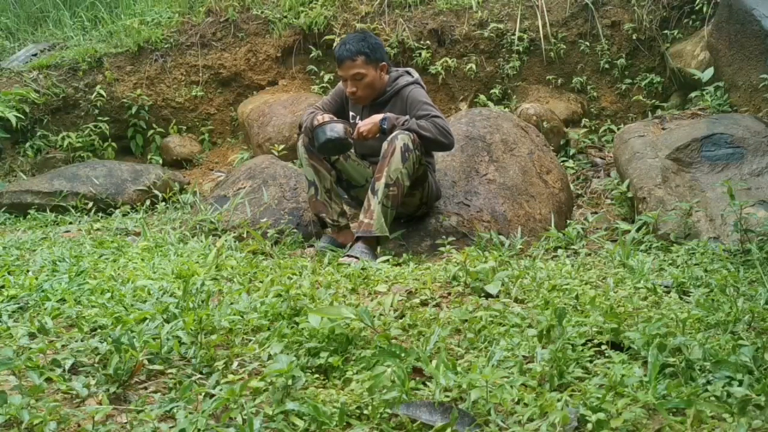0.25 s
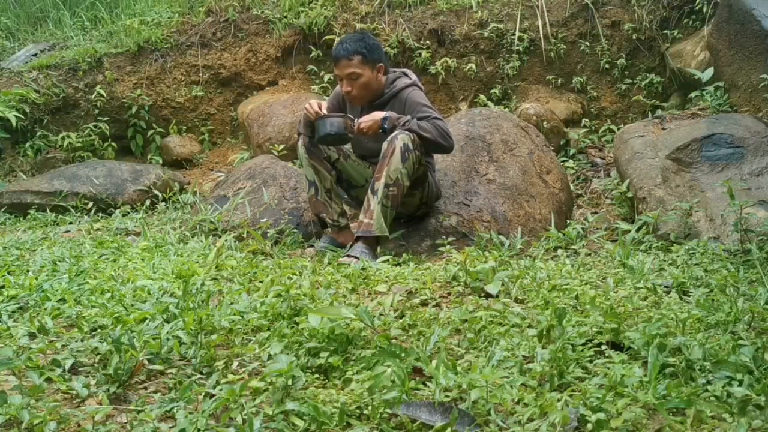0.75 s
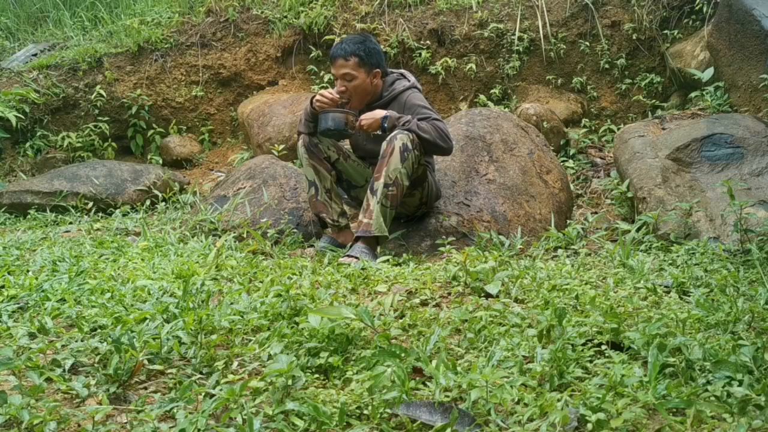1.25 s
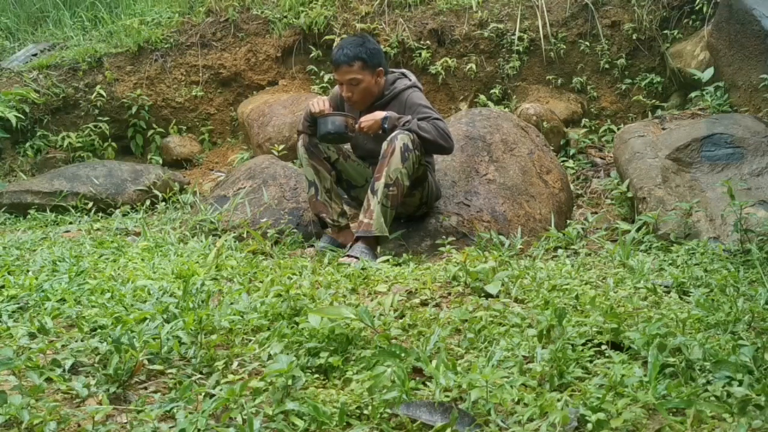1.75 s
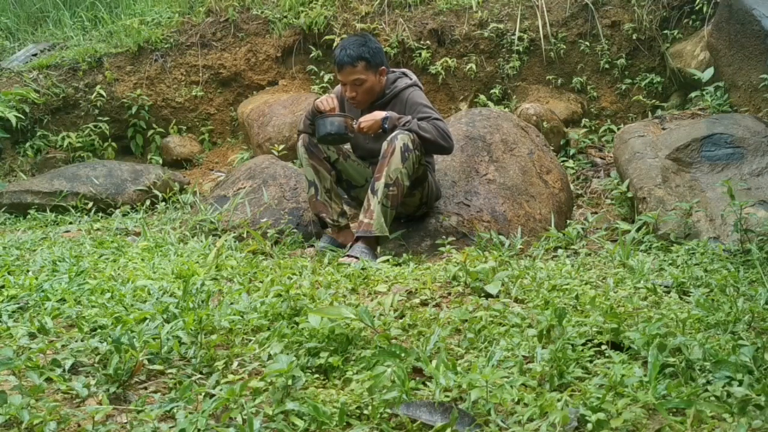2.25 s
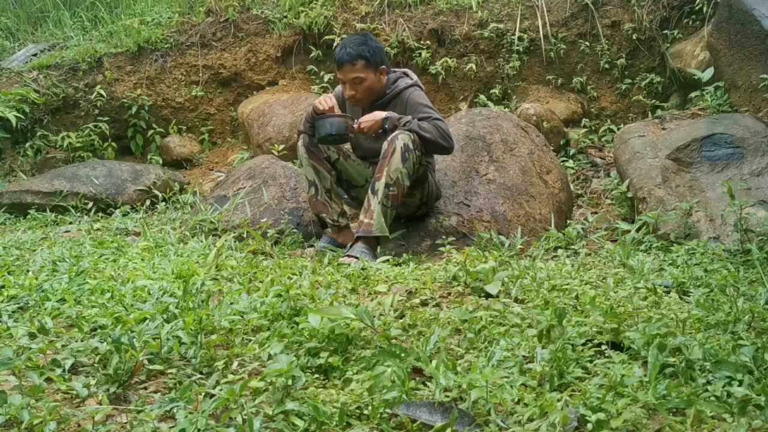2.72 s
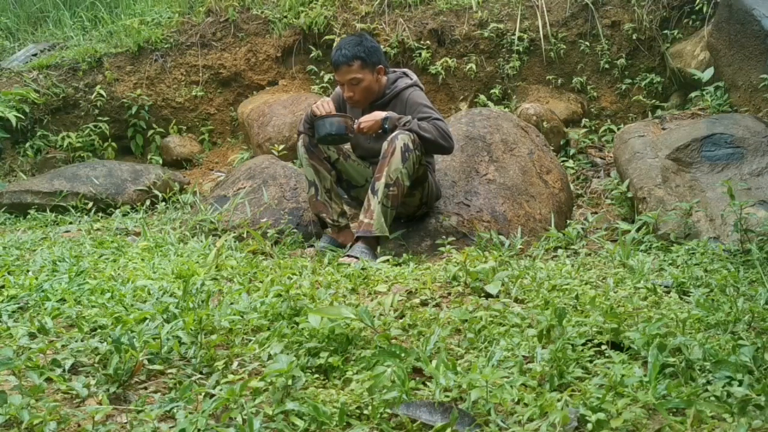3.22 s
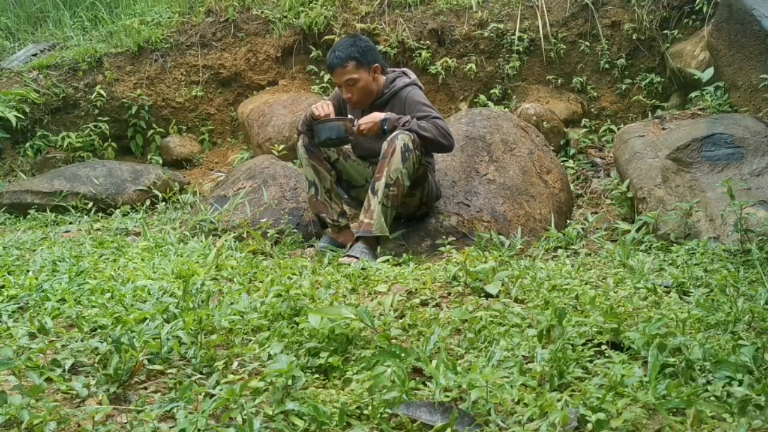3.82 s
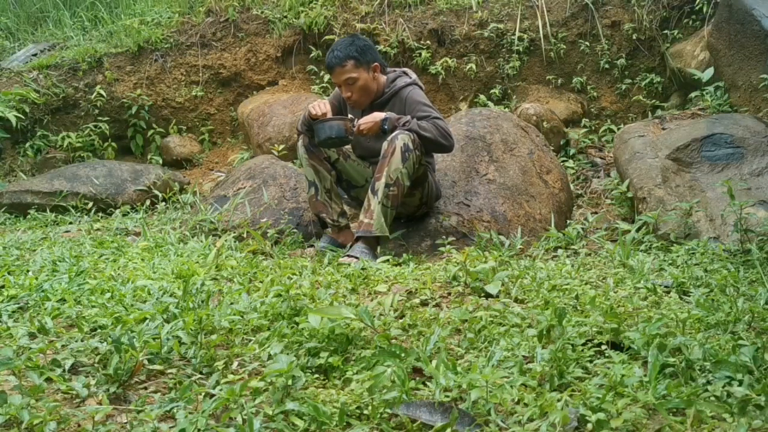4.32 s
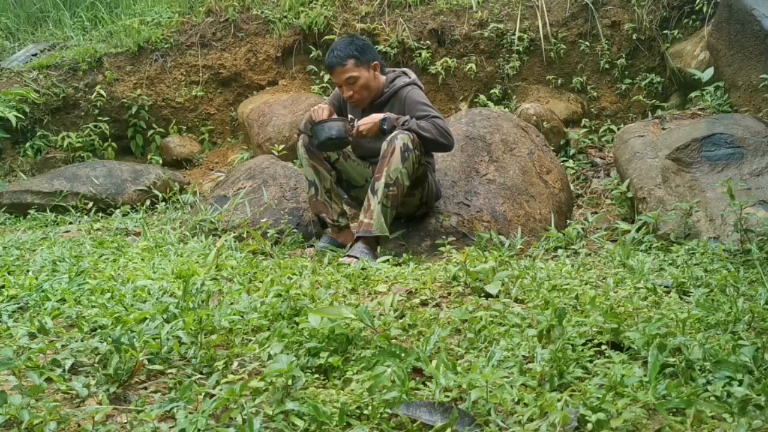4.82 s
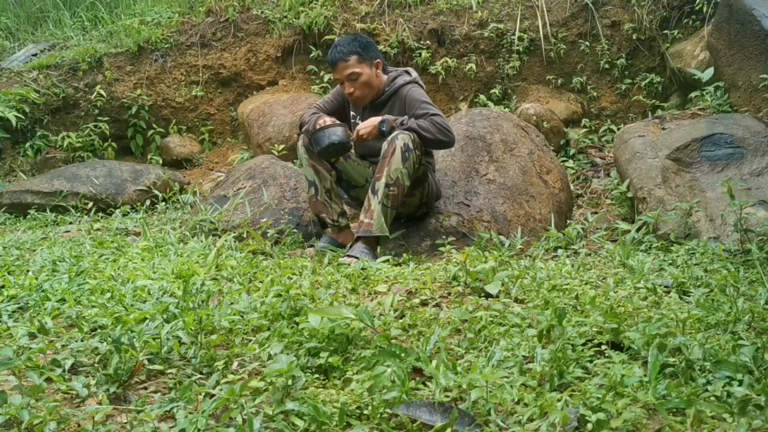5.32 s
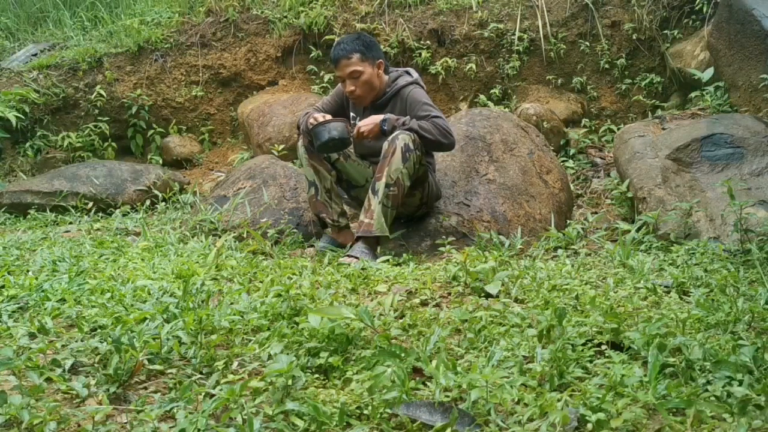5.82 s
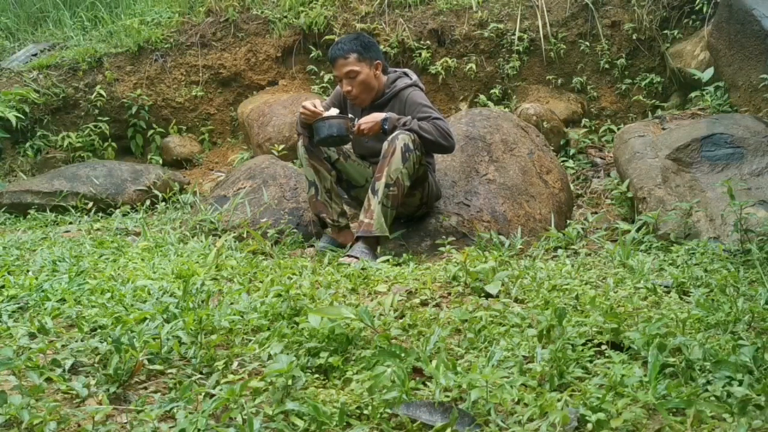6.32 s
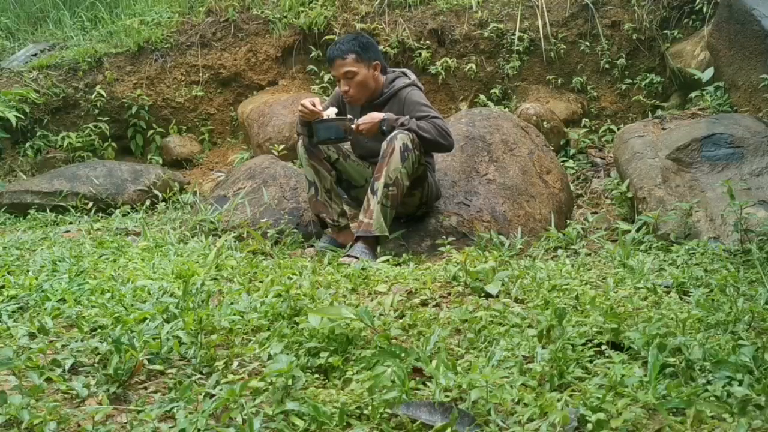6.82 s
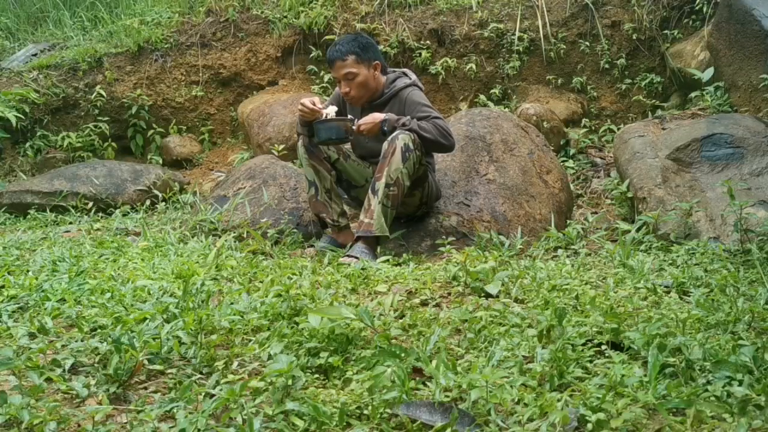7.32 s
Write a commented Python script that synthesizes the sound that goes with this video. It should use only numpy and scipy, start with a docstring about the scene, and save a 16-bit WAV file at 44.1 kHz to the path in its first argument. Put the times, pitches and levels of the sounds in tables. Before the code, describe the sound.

Piercing, gliding insect whine in a tropical clearing, pausing once, with throbbing katydid rasps, distant low engine hum and faint scrapes of a pot.

```python
"""Insects in a forest clearing

A near cicada sings a gliding whine of four tymbal partials, breaks into a buzz of noise bands, rests and starts again;
its partials fade separately at each ear as echoes off the trees interfere. Farther cicadas are thin fading lines,
a katydid throbs in bursts of banded noise, a cricket gives two short sine peeps and a chorus hisses as shaped noise.
A distant engine hums on the left in roughened low orders, and a pot is tapped and scraped in faint puffs of noise."""
import sys
import numpy as np
from scipy import signal
from scipy.fft import rfft, irfft, next_fast_len
from scipy.io import wavfile
from scipy.ndimage import uniform_filter1d, map_coordinates

SR = 44100
rng = np.random.default_rng(int(sys.argv[2]) if len(sys.argv) > 2 else 0)


def boost(x):
    """Linear amplitude factor 10**(x/20) for a level x in decibels (scalar or array-like)."""
    u = np.asarray(x, float) / 20
    return 10 ** u


def wav_record(signal):
    """Record a signal, one row per channel, as 16-bit PCM in the file named by sys.argv[1]."""
    frames = np.transpose(np.atleast_2d(signal))
    bounded = np.clip(frames, -1, 1)
    # unit amplitude maps onto the largest positive 16-bit level
    quanta = np.round(bounded * 32767).astype(np.int16)
    wavfile.write(sys.argv[1], SR, quanta)


N = 332999
TIME = np.arange(N) / SR
HALVES = np.array([[.5], [-.5]])  # shares a left-over-right difference between the two ears

# Clean song of the near cicada. Each row: start in seconds, start of the release in seconds, gain in dB,
# gain of the second partial over the rest in dB.
PHRASES = [(0.05, 3.28, -1, 0.5), (4.54, 7.7, -0.5, -2.5)]


def unit(x):
    """Scaled to rms 1."""
    return x / np.sqrt(np.mean(np.abs(x) ** 2) + 1e-20)


def along(points, hz):
    """Reads (Hz, value) points on a log frequency axis."""
    f, v = np.transpose(points)
    return np.interp(np.log(hz + 1), np.log(f + 1), v)


def curves(rows):
    """One value per sample for each column after the time."""
    s, *cols = np.transpose(rows)
    return np.array([np.interp(TIME, s, c) for c in cols])


def wobble(rate):
    """A smooth random curve for each ear, rate knots a second."""
    knots = rng.standard_normal((2, 4000))
    coarse = TIME[::16]
    return np.array([np.interp(TIME, coarse, map_coordinates(k, [coarse * rate])) for k in knots])


def fading(rate):
    """Complex gain of many interfering paths, rms 1, different at each ear."""
    return unit(wobble(rate) + 1j * wobble(rate))


def turns(hz):
    """Running phase of a pitch curve, in radians."""
    return 2 * np.pi * np.cumsum(hz) / SR


def swells(rest_db, rows):
    """A resting gain with bell-shaped (centre s, half length s, dB) swells added to it."""
    return boost(rest_db) + sum(boost(db) * np.exp(-((TIME - s) / half) ** 2) for s, half, db in rows)


def filtered(x, response):
    """Applies a response of frequency to x."""
    m = next_fast_len(N + 8192)
    return irfft(rfft(x, m) * response(np.fft.rfftfreq(m, 1 / SR)), m)[..., :N]


def bands(table):
    """Noise of rms 1 in bell-shaped (Hz, width Hz, relative dB) bands, unrelated at the two ears."""
    def shape(hz):
        power = sum(boost(2 * db) / w * np.exp(-4 * ((hz - c) / w) ** 2) for c, w, db in table)
        return np.sqrt(power)
    return unit(filtered(rng.standard_normal((2, N)), shape))


def partial(phase, ears_db, alike, flutter, smear_db, smear_rate):
    """A sine at each ear that flutters and shifts apart as likeness falls, in an even smear scattered by the leaves."""
    apart = HALVES * np.arccos(np.clip(alike, -1, 1))
    direct = boost(ears_db) * np.exp(1j * apart) * (1 + flutter * fading(30))
    smear = uniform_filter1d(boost(ears_db + smear_db), size=SR) * fading(smear_rate)
    return np.sqrt(2) * ((direct + smear) * np.exp(1j * phase)).real


def stroke_line(phase, multiple, db, rate):
    """One line of the comb that repeated muscle strokes make, fading at random."""
    ribs = 9  # tymbal cycles for each muscle stroke
    return np.sqrt(2) * boost(db) * (fading(rate) * np.exp(1j * phase * multiple / ribs)).real


def heard(hz):
    """Level at each ear and likeness of a partial: echoes off the trees add up or cancel by pitch."""
    # The pitches in Hz at which the clearing is known, rising.
    clearing_hz = [3050, 3062, 3074, 3089, 3092, 3098, 3101, 3122, 3128, 3131, 3149, 3155, 3170, 3176, 3185,
                   3197, 3203, 3207, 6100, 6220, 6238, 6274, 6286, 6322, 6358, 6364, 6388, 6415, 9150, 9204,
                   9231, 9258, 9330, 9622, 12200, 12216, 12232, 12240, 12256, 12264, 12280, 12296, 12304,
                   12312, 12320, 12328, 12344, 12360, 12368, 12392, 12400, 12432, 12440, 12456, 12472,
                   12488, 12504, 12520, 12560, 12576, 12592, 12600, 12608, 12624, 12632, 12648, 12672,
                   12704, 12720, 12728, 12776, 12784, 12800, 12816, 12824, 12830]
    # What reaches the microphones at each of them. Each row: left in dB, right in dB, before the song's own gains,
    # left-right likeness (held within -1 to 1 in use).
    clearing = [(-70, -58.5, 1.0), (-69, -63.5, -0.59), (-65, -65, -0.87), (-72, -67.5, 0.29),
                (-85, -63, -0.88), (-60, -60.5, -0.49), (-80, -64.5, -0.32), (-52, -65, -0.79),
                (-53, -78, 0.48), (-58, -64.5, 0.68), (-63, -59, -0.28), (-64, -64, -0.42),
                (-63, -55.5, 0.49), (-64, -55.5, -0.83), (-63, -71, -0.27), (-67, -73, -0.6),
                (-60, -60, -0.4), (-68, -65, -0.93), (-79, -67, -0.44), (-60.5, -84, 0.99),
                (-63.5, -66, -0.42), (-62.5, -69, 1.0), (-69, -65, 0.93), (-65.5, -70, 0.29),
                (-63, -72, -1.3), (-63, -65, 0.9), (-67, -74, -0.3), (-63.5, -59, 1.0), (-70, -72, 0.5),
                (-73, -75, -0.32), (-76, -70, 0.5), (-69.5, -85, -0.49), (-87, -80, -0.0), (-90, -84, -1.1),
                (-49, -48, -0.007), (-52, -44, 0.36), (-45, -51, -0.093), (-53, -59, -0.5), (-58, -51, 0.7),
                (-47, -47.5, 0.99), (-50, -52, 0.4), (-44.5, -45, 0.4), (-43, -54, -0.41), (-66, -54, -1.3),
                (-46, -53, -0.53), (-56, -47, -0.84), (-49, -50, 0.84), (-58, -58, -1.2), (-61, -51, 0.6),
                (-59, -46.5, -1.1), (-63, -47.5, 0.16), (-46.5, -43, -0.76), (-63, -45, -1.8),
                (-50, -52, -0.37), (-56, -51.5, 0.47), (-47, -50, -1.8), (-58, -46, 1.0), (-52, -65, -0.95),
                (-59, -47, -0.41), (-54, -68, -0.96), (-52, -40.5, 0.99), (-51, -41.5, -0.0),
                (-42.5, -43.5, -0.58), (-48, -44, 1), (-79, -47, -0.52), (-58, -45, -2), (-53, -57.5, 0.52),
                (-42, -47.5, 0.9), (-50.5, -46, 0.2), (-53, -53.5, -0.58), (-60, -49.5, 0.5),
                (-47, -42.5, 0.56), (-59, -43.5, 0.25), (-61, -36, -0.41), (-56, -52, -1.0),
                (-60, -48.5, 0.42)]
    left, right, alike = (np.interp(hz, clearing_hz, c) for c in np.transpose(clearing))
    return np.array([left, right]), alike


def phrases(attack_s, lead_s=0, second=0):
    """Gain of the clean song: attack, hold and release of each phrase, as squared ramps."""
    release_s = .09
    gain = np.zeros(N)
    for start, end, db, second_db in PHRASES:
        rise = (TIME + lead_s - start) / attack_s
        fall = 1 + (end - TIME) / release_s
        gain += boost(db + second * second_db) * np.clip(np.minimum(rise, fall), 0, 1) ** 2
    return gain


def cicada():
    """Four partials of the tymbal, the stroke lines beside them, and the buzz where strokes turn irregular."""
    # Glide of the near cicada. Each row: time in seconds, tymbal pitch in Hz.
    glide = [(0.1, 3209.9), (1.1, 3178.6), (2.3, 3145.6), (2.9, 3119.1), (3.1, 3108.5), (3.3, 3103.8),
             (4.58, 3048.7), (4.78, 3054.6), (5.18, 3072.2), (5.98, 3098.7), (6.38, 3115.4), (6.78, 3133.5),
             (7.18, 3157.6), (7.38, 3180.2), (7.55, 3195.2)]
    # The echo pattern slides a little as the air moves. Each row: time in seconds, slide in Hz at the first partial.
    slip = [(4, 0), (4.5, -1), (7.1, -1), (7.3, 2.5)]
    # Weak lines a stroke rate apart. Each row: multiple of the stroke rate, left in dB, right in dB,
    # both before the common lift and the phrase gain.
    lines = [(10, -85, -88), (26, -83, -85), (28, -87, -84), (34, -93, -90), (35, -82, -78), (37, -70, -67),
             (38, -86, -84)]
    # Rough start and end of a phrase, a list for each. Each row: time in seconds, level in dB before
    # smoothing and roughening.
    rough_parts = [
        [(0, -62), (.09, -58.5), (.15, -63), (.25, -87)],
        [(3.15, -82.5), (3.28, -57), (3.45, -54.5), (3.6, -58.5), (3.75, -60), (3.9, -69), (4.05, -73)],
    ]
    # Colour of the buzz. Each row: centre in Hz, width in Hz, relative level in dB.
    buzz_bands = [(3110, 360, -6), (6240, 440, 0), (8940, 420, -13), (12340, 600, 2.5)]
    attack_s, stroke_attack_s = 0.11, 0.25  # the stroke lines speak late
    lead_s = .13  # the second partial speaks early
    flare_db, flare_s = 18, 0.088  # the third partial flares around each phrase start

    pitch = curves(glide)[0]
    phase = turns(pitch)
    slid = pitch + curves(slip)[0]
    flare = 1 + sum(boost(flare_db) * np.exp(-np.abs(TIME - s) / flare_s) for s, *_ in PHRASES)

    song = partial(phase, *heard(slid), flutter=0.18, smear_db=-14.0, smear_rate=90)
    second = partial(2 * phase, *heard(2 * slid), flutter=0.28, smear_db=-8.5, smear_rate=13)
    song += partial(3 * phase, *heard(3 * slid), flutter=0.38, smear_db=-6.5, smear_rate=15) * flare
    song += partial(4 * phase, *heard(4 * slid), flutter=.5, smear_db=-21, smear_rate=500)
    second *= phrases(attack_s, lead_s, second=1)

    strokes = sum(stroke_line(phase, k, np.array([[left], [right]]), rate=11) for k, left, right in lines)
    strokes *= boost(4.5)

    buzz_gain = sum(boost(curves(rows)[0]) * (TIME > rows[0][0]) * (TIME < rows[-1][0]) for rows in rough_parts)
    buzz = uniform_filter1d(buzz_gain, size=2000) * boost(1.5 * wobble(60)) * bands(buzz_bands)
    return song * phrases(attack_s) + second + strokes * phrases(stroke_attack_s) + buzz


def rush(spectrum, patchy_db):
    """Stereo noise of rms 1 with patches of random gain over time and pitch."""
    # How alike the two microphones hear it. Each row: frequency in Hz, left-right likeness from -1 to 1.
    likeness = [(60, 0.29), (130, 1), (280, 0.72), (610, 0.28), (1330, -0.29), (2880, 0.1), (6240, -0.1),
                (13500, 0.18)]
    # Which side it leans to. Each row: frequency in Hz, left over right in dB.
    side_lean = [(60, -0.5), (110, 11.5), (200, 5.5), (370, 2), (670, 0.5), (1220, 3), (2220, -0.5),
                 (4060, 4.5), (7420, 2), (13500, -3.5)]

    def mid_side(hz):
        turn = np.arccos(np.clip(along(likeness, hz), -1, 1)) / 2
        return boost(along(spectrum, hz)) * [np.cos(turn), np.sin(turn)]

    z = signal.stft(rng.standard_normal((2, N)), nperseg=512)[2]
    field = uniform_filter1d(rng.standard_normal(z.shape[1:]), size=6, axis=0)
    field = uniform_filter1d(field, size=14, axis=1)
    pair = signal.istft(z * boost(patchy_db * unit(field)), nperseg=512)[1][:, :N]
    mid, side = filtered(pair, mid_side)
    ears = np.array([mid + side, mid - side])
    return unit(filtered(ears, lambda hz: boost(HALVES * along(side_lean, hz))))


def chorus():
    """Countless far insects merge into bands of hiss over the breath of the forest."""
    # Colour of the insect hiss. Each row: frequency in Hz, relative level in dB per Hz.
    insect_hiss = [(2900, -21.5), (3300, -15.5), (3900, -13), (4100, -3), (4600, -0.5), (5250, -6.5),
                   (5500, -10.5), (5800, -7.5), (6050, -4), (6500, 1), (7350, -1), (7650, -13.5),
                   (8300, -13), (8800, -13), (11200, -16.5), (12000, -10), (12800, -1), (13050, -17),
                   (13700, -24)]
    # Colour of the forest's breath. Each row: frequency in Hz, relative level in dB per Hz.
    breath = [(12, -16), (20, -4.5), (38, -4.5), (114, -2), (150, -6), (197, -3.5), (242, -9.5),
              (299, -7.5), (445, -13.5), (1170, -19), (2190, -17), (2650, -19), (3000, -15), (3900, -26.5),
              (6600, -120)]
    return boost(-57.5) * rush(insect_hiss, patchy_db=0.46) + boost(-60.0) * rush(breath, patchy_db=1.55)


def engine():
    """Unsteady low orders of a far engine, rougher as they rise, among other fuzzy hums from the same side."""
    # Pace of the engine. Each row: time in seconds, firing rate in Hz before a slight random wobble.
    firing = [(0, 98), (0.9, 99.5), (1.4, 101), (1.9, 102.8), (2.35, 103), (2.8, 104.8), (5.3, 104.8),
              (6.3, 102.5), (7.55, 100.6)]
    # Its hum, before the dips and the mix to two ears. Each row: time in seconds, first order in dB,
    # second over first order in dB.
    order_levels = [(0, -62, 7.5), (0.4, -59, -10.5), (1.02, -56, -14), (1.2, -54, -1), (1.68, -50.5, -3.5),
                    (2, -59, 3.5), (2.2, -59.5, 9.5), (2.85, -61, 10.5), (3.3, -62, 16), (3.6, -56.5, 7),
                    (4.05, -55.5, 1), (4.5, -62, 6.5), (5.25, -68.5, 9), (5.45, -75, 3), (5.95, -62.5, 1),
                    (6.1, -72, 3.5), (6.65, -72, -0.5), (6.8, -62.5, -13), (7.55, -69, -18)]
    # Gain of the left over the right in dB, for orders 1 to 4.
    order_lean = [8.5, 3.8, 4.1, 2.1]
    # Share of random fading in orders 1 to 4, from 0 to 1.
    order_rough = [.2, .28, .5, .6]
    # The hum dips briefly. Each row: centre in seconds, half length in seconds, full depth in dB.
    dips = [(2.015, 0.052, 3.5), (2.545, 0.045, 8), (3.068, 0.12, 16), (3.48, 0.052, 5), (3.77, 0.082, 8.5),
            (4.1, .05, 6), (4.713, 0.041, 10)]
    # Share of the full depth taken by orders 1 and 2.
    dip_share = [0.14, 1]
    # The third and fourth orders swell. Each row: centre in seconds, half length in seconds,
    # third-order swell in dB before the mix to two ears.
    rasp_swells = [(0.696, 0.18, -66), (2.67, 0.042, -71.5), (3.45, 0.4, -61), (4.006, 0.16, -67),
                   (4.313, 0.14, -62), (4.676, 0.052, -67), (5.925, .1, -64.5)]
    # Fuzzy low tones. Each row: centre in Hz, width in Hz, resting level in dB, and swells as centre in seconds,
    # half length in seconds, level in dB; all levels before the mix to two ears.
    fuzzy_tones = [(55.3, 9.1, -66, [(5.9, .3, -68)]), (140.4, 18, -85, [(.6, 0.47, -62.5),
                   (2.95, 0.45, -63.5), (5.4, 0.97, -63.5)]), (276, 26, -74.5, [(4.6, 0.67, -68),
                   (5.9, .2, -65.5), (7.3, 0.62, -67.5)]), (341, 26, -86, [(3.4, 0.33, -63),
                   (4.7, 0.47, -66)])]

    hz = curves(firing)[0]
    first_db, second_db = curves(order_levels)
    phase = turns(hz * (1 + 0.0039 * wobble(5)[0]))
    dip_db = sum(depth_db * np.exp(-((TIME - s) / half) ** 2) for s, half, depth_db in dips)
    first = boost(first_db - dip_share[0] * dip_db)
    second = boost(first_db + second_db - dip_share[1] * dip_db)
    third = swells(-73, rasp_swells)
    fourth = boost(-11.0) * third

    out = np.zeros((2, N))
    orders = zip([first, second, third, fourth], order_lean, order_rough)
    for k, (gain, lean_db, rough) in enumerate(orders, 1):
        line = unit(((1 - rough + rough * fading(22)) * np.exp(1j * k * phase)).real)
        # mostly one signal at both ears, with a little of each ear's own
        out += gain * boost(HALVES * lean_db) * (0.65 * line[0] + 0.086 * line)
    for hum_hz, width, rest_db, rows in fuzzy_tones:
        hum = bands([(hum_hz, width, 0)])
        out += swells(rest_db, rows) * boost(HALVES * 4.4) * (0.5 * hum[0] + 0.11 * hum)
    return out


def far_cicadas():
    """The same kind of song from farther trees: only thin fading lines reach the microphone."""
    # A list for each phrase. Each row: time in seconds, tymbal pitch in Hz, level in dB before the line's own.
    far_songs = [
        [(.1, 3070, -85), (.2, 3080, -72), (.45, 3112, -70), (.9, 3090, -76), (1, 3085, -90)],
        [(1.1, 3070, -90), (1.4, 3080, -72), (2.5, 3110, -71), (3.3, 3140, -74), (4.3, 3175, -78),
         (4.5, 3180, -90)],
        [(.9, 3230, -90), (1.2, 3225, -76), (2.1, 3196, -74), (3.1, 3150, -75), (3.3, 3145, -90)],
        [(3.5, 3120, -90), (3.7, 3115, -74), (4.4, 3100, -71), (5, 3088, -75), (5.3, 3080, -90)],
        [(4.45, 3188, -90), (4.65, 3182, -70), (5.1, 3163, -72), (5.3, 3155, -90)],
    ]
    # Lines that carry. Each row: multiple of the stroke rate, relative level in dB.
    far_lines = [(9, -8), (18, -8), (27, -14), (36, 0), (37, -6)]
    out = np.zeros((2, N))
    for rows in far_songs:
        hz, db = curves(rows)
        phase = turns(hz)
        out += sum(stroke_line(phase, k, db + line_db, rate=9) for k, line_db in far_lines)
    return out


def katydid():
    """Bouts of evenly spaced, raspy flat-topped bursts of banded noise."""
    # Each row: first burst in seconds, last burst in seconds, first and last level in dB before roughening.
    bouts = [(0.1, 1.25, -64, -61.5), (1.529, 2.447, -61, -70), (2.575, 3.02, -69, -61.5),
             (3.261, 3.726, -63, -63.5), (4.161, 5.659, -62, -63), (5.857, 6.698, -69, -67),
             (6.907, 7.365, -60, -61)]
    # Colour of the bursts. Each row: centre in Hz, width in Hz, relative level in dB.
    burst_bands = [(4500, 370, -8), (4965, 490, 1)]
    throb_s = .22  # usual time from burst to burst; each bout spaces whole bursts evenly
    gain = np.zeros(N)
    for first, last, first_db, last_db in bouts:
        count = round((last - first) / throb_s) + 1
        for s, db in np.linspace([first, first_db], [last, last_db], count):
            gain += boost(db) * np.exp(-((TIME - s) / 0.074) ** 4)
    return gain * boost(1.1 * wobble(70)) * bands(burst_bands)


def pot():
    """Faint soft taps and scrapes: quick puffs of noise, each in its own band."""
    # Each row: time in seconds, level in dB before the lean, lowest Hz, highest Hz, decay time in seconds,
    # left over right in dB.
    taps = [(0.77, -68.5, 800, 1183, 0.026, 0), (0.788, -61.5, 2350, 3020, 0.02, 0),
            (1.549, -58.5, 300, 940, 0.0068, 6), (2.498, -67, 500, 900, 0.02, -2),
            (4.334, -59.5, 1410, 3620, 0.022, 7), (4.98, -68, 900, 2500, 0.023, 2),
            (6.74, -66, 500, 3000, 0.067, 4), (6.871, -65, 1550, 3560, 0.072, 2),
            (7.51, -59.5, 1430, 4500, .025, 8)]
    out = np.zeros((2, N))
    t = np.arange(-300, 5000) / SR
    for s, db, low_hz, high_hz, length, lean_db in taps:
        swell = np.exp(-np.abs(t) / np.where(t < 0, .006, length))
        puff = swell * rng.standard_normal(len(t))
        puff = signal.sosfilt(signal.butter(2, [low_hz, high_hz], "band", fs=SR, output="sos"), puff)
        puff /= np.sqrt(2 * (high_hz - low_hz) / SR)  # evens out the loss to the band
        reach = out[:, round(s * SR) - 300:][:, :len(t)]
        reach += boost(db + HALVES * lean_db) * puff[:reach.shape[1]]
    return out


def cricket():
    """Short pure notes: a sine under flat-topped envelopes, the same at both ears."""
    # Each row: centre in seconds, length in seconds, peak level in dB.
    peeps = [(1.052, 0.037, -64), (1.293, 0.076, -62)]
    gain = sum(boost(db) * np.exp(-(2 * (TIME - s) / length) ** 4) for s, length, db in peeps)
    return gain * np.sin(2 * np.pi * 8195 * TIME)


def scene():
    """Everything heard in the clearing."""
    return cicada() + chorus() + engine() + far_cicadas() + katydid() + pot() + cricket()


def band_limit(x):
    """A steep low-pass at the top of the band."""
    return signal.sosfilt(signal.butter(12, 13770, fs=SR, output="sos"), x)


def record(dry):
    """The finished stereo take of the clearing."""
    return band_limit(dry)


dry = scene()
out = record(dry)
wav_record(out)
```